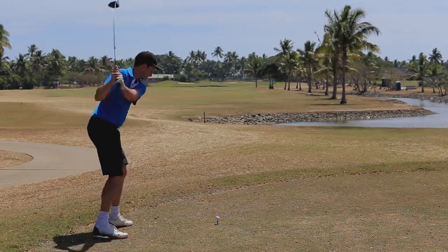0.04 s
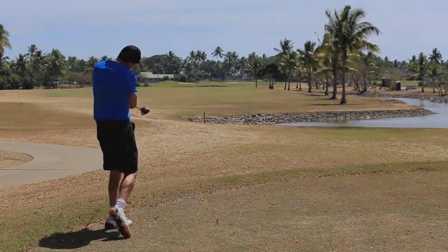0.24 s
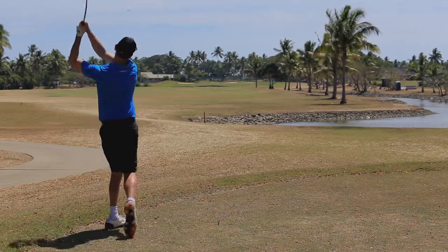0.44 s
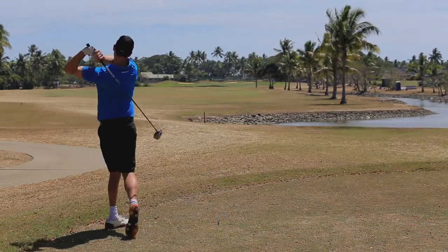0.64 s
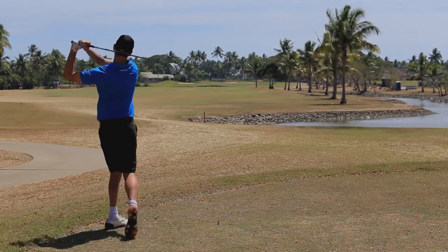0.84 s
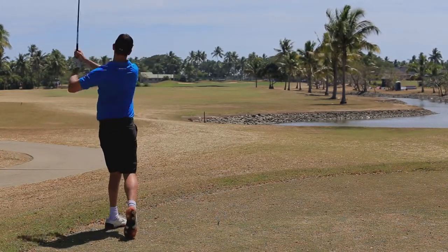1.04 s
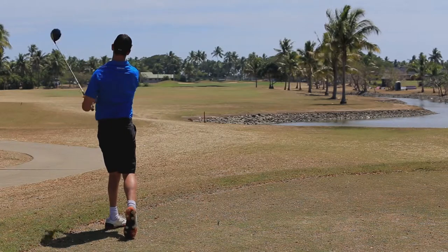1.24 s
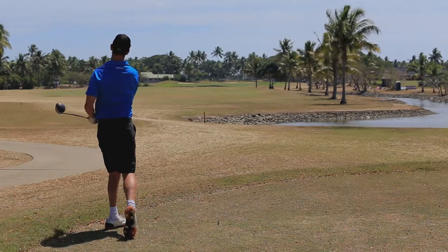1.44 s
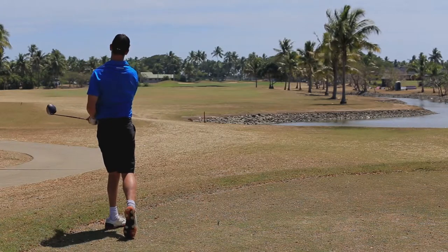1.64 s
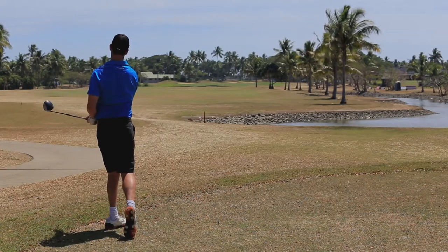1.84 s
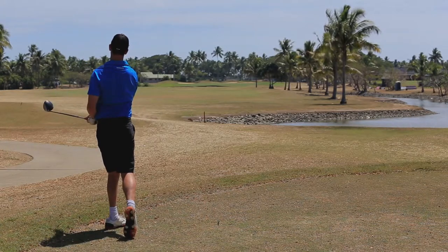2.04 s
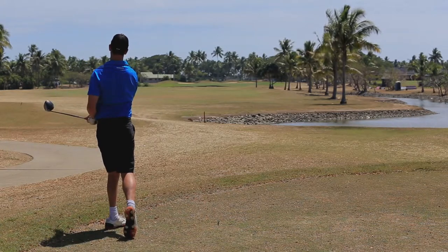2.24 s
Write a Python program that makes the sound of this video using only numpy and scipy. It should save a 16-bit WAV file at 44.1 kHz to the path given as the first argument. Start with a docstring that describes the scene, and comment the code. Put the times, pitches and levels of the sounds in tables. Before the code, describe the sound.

A golf driver swishes down and cracks a teed ball with a sharp metallic click outdoors.

```python
"""A golf driver swishes down and hits a teed ball on a quiet, open course, in a light breeze.
The shaft's whirl is noise played faster or slower; the air round the head adds a rush of noise.
The hit is a burst of noise, short knocks and ringing modes, with a bounce off the turf.
The ball leaves as a fading hiss, with a faint scattered tail; clothes and a foot rustle softly.
A limiter flattens the hit, and the gain dips briefly after it."""
import sys
import numpy as np
from scipy.fft import rfft, irfft, next_fast_len
from scipy.io import wavfile
from scipy.ndimage import uniform_filter1d, minimum_filter1d, map_coordinates

SR = 44100
rng = np.random.default_rng(int(sys.argv[2]) if len(sys.argv) > 2 else 0)


def wav_out(sig):
    """Save sig, one row per channel (or a flat mono array), as 16-bit PCM at SR to the path in sys.argv[1]."""
    wavfile.write(sys.argv[1], SR, np.round(np.clip(np.atleast_2d(sig).T, -1, 1) * 32767).astype(np.int16))


N = 101429  # length in samples

HIT_S = 0.2575  # moment of impact


def amp(db):
    """Turn decibels into a gain."""
    return 10 ** (np.asarray(db) / 20)


def clock():
    """Time of each sample in seconds."""
    return np.arange(N) / SR


def filtered(x, response):
    """Scale each frequency of x by response(Hz)."""
    size = next_fast_len(len(x) + 8192)  # spare room so the end does not wrap onto the start
    spectrum = rfft(x, size) * response(np.fft.rfftfreq(size, 1 / SR))
    return irfft(spectrum, size)[:len(x)]


def noise(colour, size=N):
    """Noise of rms 1, its spectrum shaped by a table of frequency and relative level."""
    f, level = np.transpose(colour)

    def response(hz):
        return amp(np.interp(np.log(hz + 1), np.log(f + 1), level))

    x = filtered(rng.standard_normal(size), response)
    return x / x.std()


def delayed(x, seconds):
    """The same signal, that much later."""
    return np.interp(clock() - seconds, clock(), x, left=0)


def since_hit():
    """Seconds since impact, zero before it."""
    return np.maximum(clock() - HIT_S, 0)


def decay(t60):
    """Start at 1 on impact and fall 60 dB in t60 seconds."""
    t = since_hit()
    return (t > 0) * np.exp(-np.log(1000) * t / t60)


def ring(hz, db, t60):
    """One mode set off by the impact: a sine that dies away."""
    return amp(db) * decay(t60) * np.sin(2 * np.pi * hz * since_hit())


def breeze():
    """Distant rumble and wind in the palms: noise that swells slightly and slowly eases."""
    # colour of the wind: f/Hz, relative level/dB
    wind_colour = [(12, -42), (20, -13.5), (42, -5), (70, 1), (103, -1.5), (129, -2), (153, -4.5),
                   (175, -3), (207, -7.5), (238, -1), (266, -9.5), (324, -13), (393, -14.5), (452, -16.5),
                   (505, -14), (565, -14.5), (906, -13), (2270, -24), (3260, -23), (6360, -38),
                   (15500, -49.5)]
    start_db, swell_db, fade_db_per_s = -51, 0.87, 0.5
    # a smooth random curve through 4 points per second
    swell = map_coordinates(rng.standard_normal(size=64), [clock() * 4], mode="wrap")
    level = start_db + swell_db * swell - fade_db_per_s * clock()
    return amp(level) * noise(wind_colour)


def clothes():
    """Clothes rub as the body turns: noise that rises and falls smoothly."""
    # colour of the rustle: f/Hz, relative level/dB
    cloth_colour = [(500, -9), (1800, 3.5), (3500, 0.5), (6000, -11), (10000, -17), (15500, -29)]
    peak_db, peak_s, width_s = -62, 0.056, 0.19
    turning = np.exp(-((clock() - peak_s) / width_s) ** 2)
    return amp(peak_db) * noise(cloth_colour) * turning


def shaft_whirl():
    """Air whirls off the shaft: a faster club gives a higher pitch and, mostly, more level."""
    # path of the swing: t/s, pitch of the whirl f/Hz, level/dB
    swing_path = [(.135, 378.6, -68), (.175, 559, -50.5), (.222, 720.6, -38), (.253, 759.8, -36),
                  (.272, 490, -46), (.332, 440.6, -50), (.39, 349.7, -57.5), (.445, 250.4, -53.5),
                  (.52, 200.8, -68)]
    # colour of the whirl at its normal pitch: f/Hz, relative level/dB
    whirl_colour = [(150, -23), (380, -15.5), (520, -1), (720, -1), (920, -2), (1120, -17), (2000, -20),
                    (4000, -59.5)]
    normal_hz = 700  # the pitch at which the noise plays at normal speed
    t = clock()
    s, pitch, level = np.transpose(swing_path)
    # place in the noise, in samples: a higher pitch moves through it faster
    travel = np.cumsum(np.interp(t, s, pitch)) / normal_hz
    whirl = map_coordinates(noise(whirl_colour), [travel], mode="wrap")
    return whirl * amp(np.interp(t, s, level, left=-120, right=-120))


def head_rush():
    """Air rushes round the club head: noise strongest at impact, fading faster than it grew."""
    # colour of the rush: f/Hz, relative level/dB
    rush_colour = [(300, -17.5), (1200, -10.5), (1700, -5), (3500, -3), (5500, -11), (9000, -18.5),
                   (15000, -30.5)]
    peak_db, rise_s, fall_s = -42, 0.049, 0.013
    lead = clock() - HIT_S
    swell = np.exp(-np.abs(lead) / np.where(lead < 0, rise_s, fall_s))
    fade_in = np.clip(1 + lead / 0.13, 0, 1)  # silent until 0.13 s before impact
    return amp(peak_db) * noise(rush_colour) * swell * fade_in


def contact():
    """Face meets ball: a crack of noise and the squashed ball's knock, then both off the turf."""
    # colour of the crack of the face: f/Hz, relative level/dB
    crack_colour = [(150, -26), (700, 1.5), (1400, -2), (2400, 0.5), (4200, -1), (5200, -12), (7500, 2.5),
                    (9500, -0.5), (12000, -16.5), (15500, -15)]
    # modes of the ball's knock: f/Hz, starting level/dB, time to fall 60 dB t/s
    ball_modes = [(197, -9, 0.016), (580, 3, 0.0049), (1433, -2.5, 0.0043), (2490, -0.5, 0.0085)]
    crack_db, crack_t60_s = -3, 0.017
    turf_delay_s, turf_db = 0.0031, -6
    crack = amp(crack_db) * noise(crack_colour) * decay(crack_t60_s)
    knock = sum(ring(hz, db, t60) for hz, db, t60 in ball_modes)
    direct = crack - knock
    return direct + amp(turf_db) * delayed(direct, turf_delay_s)


def head_ring():
    """The hollow metal head rings in many modes, which build up just after the hit."""
    # clear modes: f/Hz, starting level before the build-up/dB, time to fall 60 dB t/s
    head_modes = [(2918, -29.5, 0.16), (3040, -20.5, 0.057), (3705, -29, 0.15), (3885, -17, 0.1),
                  (3976, -15, 0.07), (4082, -8.5, 0.046), (4228, -5.5, 0.039), (4255, -3.5, 0.04),
                  (5200, -36, 0.16), (5516, -19.5, 0.052), (5924, -14.5, 0.044), (6210, -16.5, 0.075),
                  (6290, -12.5, 0.049), (6985, -17.5, 0.057), (7123, -15.5, 0.051), (7623, -28, .08),
                  (8370, -28, .036), (8540, -27, 0.058), (9220, -25, .05)]
    # colour of the dense minor modes, heard as a shimmer: f/Hz, relative level/dB
    shimmer_colour = [(1800, -42), (2900, -8.5), (3400, -4), (4100, 0.5), (4800, -10.5), (6300, -3),
                      (8500, 6), (11000, -17), (15500, -21)]
    shimmer_db, shimmer_t60_s = -21.5, 0.075  # level before the build-up
    rise_s = 0.0014
    modes = sum(ring(hz, db, t60) for hz, db, t60 in head_modes)
    shimmer = amp(shimmer_db) * noise(shimmer_colour) * decay(shimmer_t60_s)
    build_up = 1 - np.exp(-since_hit() / rise_s)
    return (modes + shimmer) * build_up


def air_push():
    """The hit pushes the air: one low, quickly damped sine."""
    return ring(hz=41.3, db=-24.5, t60=0.091)


def flight():
    """The spinning ball hisses: noise that rises quickly, then fades as the ball leaves."""
    # colour of the hiss: f/Hz, relative level/dB
    hiss_colour = [(500, -9.5), (1000, -10), (2200, -19), (2950, -5), (3600, -14), (4200, 2.5), (4480, 2),
                   (4640, 3), (4880, -11), (6500, -7.5), (9400, -10), (11000, -18.5), (15500, -30)]
    hiss_db, rise_s, fade_db_per_s = -43, 0.049, 49.5  # hiss_db is before the fades
    near_s, gone_s = 0.24, 0.03  # time after impact of the last fade-out, and its width
    t = since_hit()
    rise = np.minimum(t / rise_s, 1)
    fade_out = (1 - np.tanh((t - near_s) / gone_s)) / 2
    leaving = amp(-fade_db_per_s * t) * fade_out
    return amp(hiss_db) * noise(hiss_colour) * rise * leaving


def scatter():
    """Banks and trees scatter the hit back: a faint, slowly dying tail of noise."""
    # colour of the tail: f/Hz, relative level/dB
    tail_colour = [(500, -18), (2000, 2), (4200, 0.5), (5300, -9), (7500, -6), (11000, -23), (15500, -26)]
    start_db, t60_s = -49, 1.56
    return amp(start_db) * noise(tail_colour) * decay(t60_s)


def foot():
    """A foot rolls on the turf in the follow-through: one soft puff of low noise."""
    # colour of the press: f/Hz, relative level/dB
    foot_colour = [(25, -20), (70, -6), (160, 4.5), (280, -17), (500, -24), (1500, -50)]
    start_s, peak_db, rise_s = 0.43, -44, 0.016
    u = np.maximum(clock() - start_s, 0) / rise_s
    press = u * np.exp(1 - u)  # reaches 1 after rise_s, then dies away
    return amp(peak_db) * noise(foot_colour) * press


def scene():
    """Everything at the microphone, as one channel."""
    swing = shaft_whirl() + head_rush()
    strike = contact() + head_ring() + air_push()
    return (breeze() + clothes() + swing + strike + flight() + scatter() + foot())[None]


def record(dry):
    """A fast limiter holds the peaks, an overload also dips the gain, and the top is cut off."""
    ceiling_db, limit_hold_s = -14.5, 0.0007
    dip_db, dip_lag_s, dip_hold_s, dip_ease_s = -7, 0.011, 0.04, 0.0024
    top_hz = 15800
    x = dry[0]
    hold = max(int(limit_hold_s * SR), 2)
    needed = np.minimum(1, amp(ceiling_db) / (np.abs(x) + 1e-9))
    limit = uniform_filter1d(minimum_filter1d(needed, hold), hold)
    # the dip lasts until dip_hold_s after the latest overload, all dip_lag_s late
    last_overload = np.maximum.accumulate(np.where(needed < 1, clock(), -1))
    overloaded = 1.0 * (clock() - last_overload < dip_hold_s)
    dipped = delayed(overloaded, dip_lag_s)
    eased = uniform_filter1d(dipped, max(int(dip_ease_s * SR), 1))
    dip = amp(dip_db * eased)
    return filtered(x * limit * dip, lambda hz: hz < top_hz)[None]


dry = scene()
out = record(dry)
wav_out(out)
```